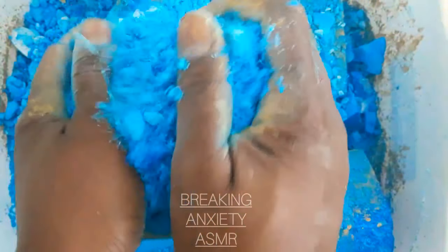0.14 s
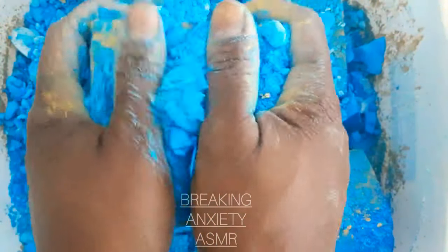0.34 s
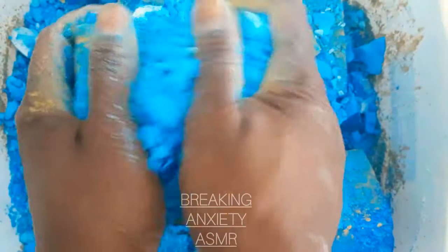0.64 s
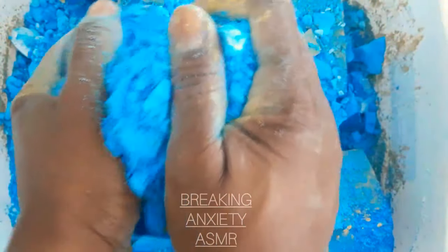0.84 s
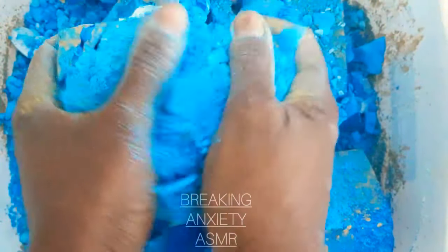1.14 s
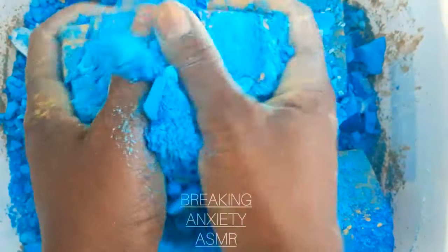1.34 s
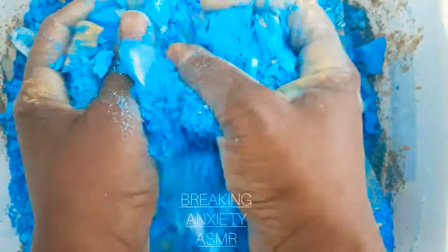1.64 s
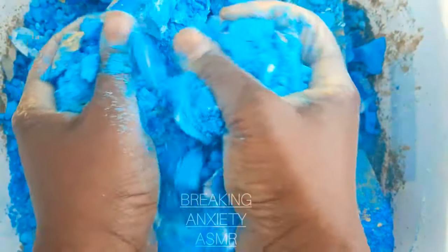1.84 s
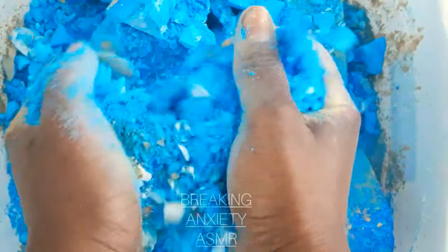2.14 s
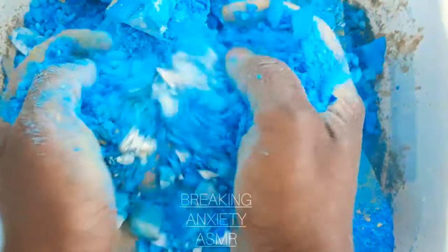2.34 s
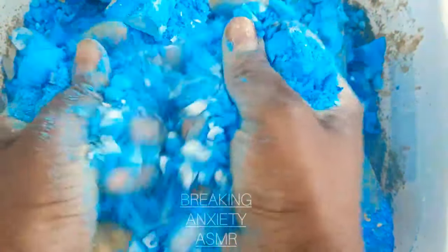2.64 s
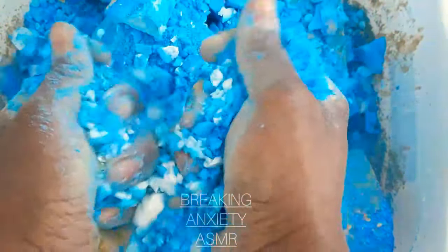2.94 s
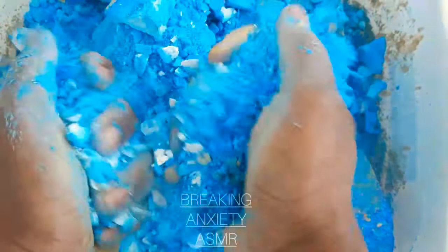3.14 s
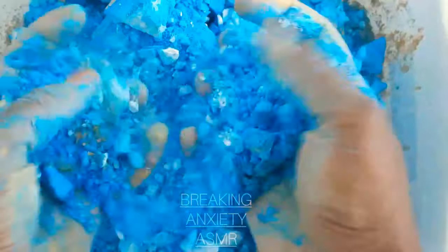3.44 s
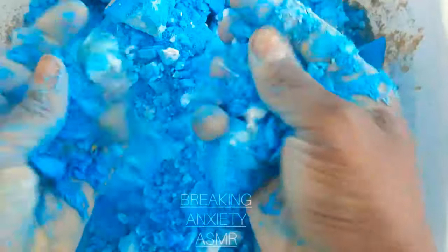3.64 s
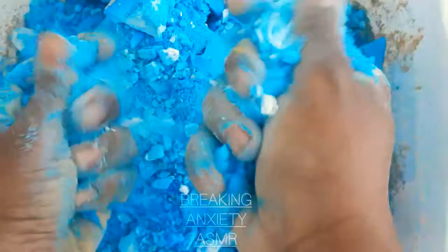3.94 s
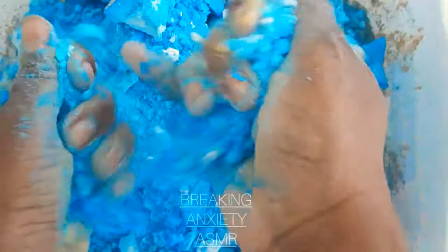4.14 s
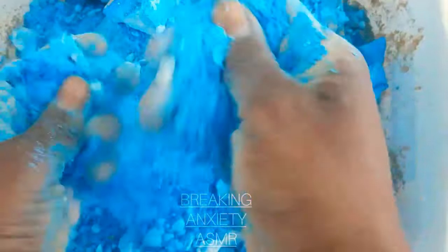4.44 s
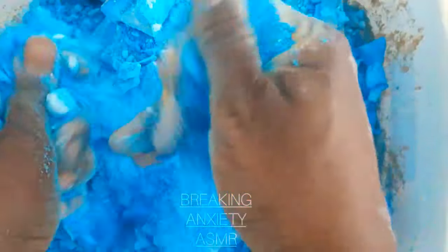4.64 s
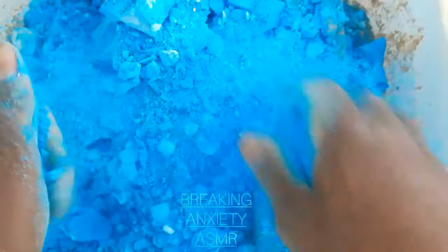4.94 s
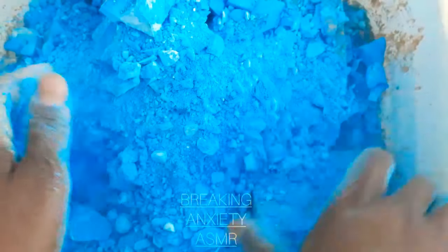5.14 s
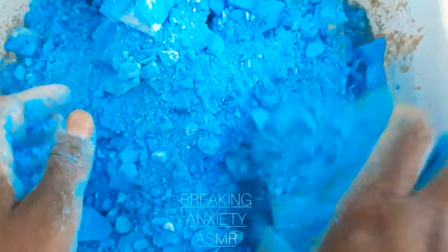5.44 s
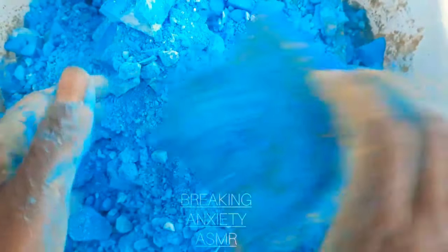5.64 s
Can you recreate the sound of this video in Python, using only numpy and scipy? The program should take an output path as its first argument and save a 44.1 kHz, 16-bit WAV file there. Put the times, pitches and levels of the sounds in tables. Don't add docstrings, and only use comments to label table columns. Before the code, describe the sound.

Brittle chalk cracks and crumbles into powder in irregular bursts, lumps knocking and crumbs pattering into a plastic tub, recorded very close.

```python
import sys
import numpy as np
from scipy import signal
from scipy.io import wavfile
from scipy.ndimage import uniform_filter1d

SR = 44100
rng = np.random.default_rng(int(sys.argv[2]) if len(sys.argv) > 2 else 0)


def transcribe(u):
    v = np.clip(np.atleast_2d(u).T, -1, 1)
    q = np.round(v * 32767).astype(np.int16)
    wavfile.write(sys.argv[1], SR, q)


def nominal_scale(level):
    x = np.asarray(level, float) / 20
    return 10 ** x


N = 254898

# time in seconds, level of the top in dB.
BRITTLE = [
    (0, -14.5),
    (2.15, -13),
    (2.3, -14.5),
    (3.2, -14.5),
    (4.9, -13),
    (5.15, -11),
    (5.3, -28),
    (5.78, -36),
]
# pitch in Hz, level in dB, t60 in seconds.
TUB_LOW = [(96, 0, .16), (120, -12, .1), (181, 0, .15), (215, -1, .11)]
# pitch in Hz, level in dB, t60 in seconds.
TUB_HIGH = [(185, -8.5, 0.13), (287, -8, 0.042), (346.5, 1, 0.056), (464.4, -10, 0.075), (571, 2.5, 0.033),
            (634, -4.5, 0.079), (775, -1, 0.031), (916, -3.5, 0.018), (1044, -2, 0.018),
            (1270, -11.5, 0.016), (1775, -18.5, 0.021), (2390, -26.5, 0.022)]


def evened(x):
    return x / np.sqrt(np.mean(x ** 2) + 1e-20)


def along(rows):
    s, *columns = np.transpose(rows)
    return [np.interp(np.arange(N) / SR, s, column) for column in columns]


def coloured(x, points):
    f, db = np.transpose(points)
    hz = np.abs(np.fft.fftfreq(4096, 1 / SR))
    gain_db = np.interp(np.log(hz + 1), np.log(f), db)
    log_gain = np.log(nominal_scale(np.maximum(gain_db, -100)))
    taps = np.fft.ifft(np.exp(np.conj(signal.hilbert(log_gain)))).real[:2048]
    return signal.oaconvolve(x, taps)[:len(x)]


def add(mix, s, sound):
    part = mix[max(round(s * SR), 0):][:len(sound)]
    part += sound[:len(part)]


def impacts(per_s, spread_db):
    when, sign, size = rng.random(N), rng.choice([-1., 1.], N), rng.exponential(1, N)
    return (when < per_s / SR) * sign * nominal_scale(spread_db * np.minimum(size, 3.8))


def crack(hz, cycles):
    turns = np.arange(200) * hz / SR
    return np.sin(2 * np.pi * turns) * turns * np.exp(-turns / cycles) * hz


def ring(hz, t60, rise_s, phase=0.):
    t = np.arange(SR // 5) / SR
    swell = np.sin(np.pi / 2 * np.minimum(t / max(rise_s, 1 / SR), 1)) ** 2
    return swell * nominal_scale(-60 * t / t60) * np.sin(2 * np.pi * (hz * t + phase))


def squeeze():
    # start in seconds, rise in seconds, hold in seconds, level in dB, release in dB per second.
    squeezes = [(-.05, 0.078, 0.053, -43, 198), (0.044, .012, 0.031, -17.5, 324),
                (0.1, 0.024, 0.049, -32, 146.5), (0.28, 0.026, 0.0092, -34.5, 148),
                (0.376, 0.099, 0.023, -33.5, 400), (0.584, 0.038, 0.19, -41.5, 232),
                (0.526, .02, 0.043, -46, 100), (0.912, 0.041, 0.042, -40.5, 248),
                (1.221, 0.041, 0.068, -44.5, 100), (1.322, 0.061, 0.15, -36.5, 100),
                (1.518, 0.068, 0.017, -30, 32), (1.786, 0.12, 0.015, -31.5, 44),
                (2.05, 0.026, 0.073, -40.5, 58), (2.19, 0.16, 0.27, -40.5, 41),
                (2.486, 0.11, 0.022, -37.5, 81), (2.748, 0.028, 0.21, -40, 101),
                (3.097, 0.026, 0.13, -54.5, 39), (3.445, 0.26, 0.082, -44, 35),
                (3.909, 0.035, 0.014, -41.5, 94), (4.107, 0.095, 0.32, -46.5, 45),
                (4.393, 0.27, 0.022, -42, 34), (5.026, 0.084, 0.1, -40, 240),
                (5.254, 0.021, 0.0045, -46.5, 124), (5.422, .12, 0.12, -52.5, 59)]
    rest_db = -46.5
    t = np.arange(N) / SR
    brittle_db, = along(BRITTLE)
    power = (nominal_scale(rest_db) * np.minimum(nominal_scale(brittle_db + 7), 1)) ** 2
    for start, rise, hold, db, release_db in squeezes:
        swell = np.sin(np.pi / 2 * np.clip((t - start) / max(rise, 1e-3), 0, 1)) ** 2
        since_release = np.clip(t - start - rise - hold, 0, 2)
        power = power + (swell * nominal_scale(db - abs(release_db) * since_release)) ** 2
    return 10 * np.log10(power)


def crumble():
    # frequency in Hz, level in dB per Hz.
    chalk_colour = [(290, -46), (500, 3), (631, -4.5), (708, -2), (1130, -1.5), (1510, -5.5), (2430, -2),
                    (6230, -4), (9630, -14.5), (15100, -33), (16000, -19)]
    grain_hz = [1100, 2300, 3200, 4400, 5800, 7800, 11000]
    top_db, = along(BRITTLE)
    dying = np.exp(-np.arange(1500) / (.0026 * SR))
    bursts = signal.oaconvolve(abs(impacts(130, 4.5)), dying)[:N]
    clumps = 0.29 + bursts / bursts.mean()
    grains = sum(signal.oaconvolve(impacts(600 * clumps, 4.1), crack(hz, 0.32))[:N] for hz in grain_hz)
    grains /= np.sqrt(uniform_filter1d(grains ** 2, 6000) + 1e-9)
    powder = rng.standard_normal(N) * clumps ** 0.27
    x = evened(coloured(grains + evened(powder), chalk_colour))
    top = signal.sosfiltfilt(signal.butter(3, 7200, "high", fs=SR, output="sos"), x)
    return nominal_scale(squeeze()) * (x + top * (nominal_scale(top_db + 14.5) - 1))


def snaps():
    # time in seconds, peak in
    # dB, centre in Hz.
    fractures = [(0.0024, -5.5, 6450), (0.0502, -2.5, 4820), (0.0546, -7, 5570), (0.0623, 1.5, 5040),
                 (0.2983, -12.5, 3020), (0.3016, -19, 4060), (0.3171, -6.5, 5100), (0.347, -21, 2860),
                 (0.3508, -15.5, 3000), (0.4116, -17.5, 3000), (0.4396, -10, 2830), (0.4993, -14, 5200),
                 (0.6135, -18.5, 3430), (0.631, -17.5, 2960), (0.6536, -16, 4500), (0.6677, -24, 3470),
                 (0.6806, -16.5, 4140), (0.689, -17.5, 3450), (0.6964, -27.5, 3360), (0.7105, -18, 3430),
                 (0.7331, -16, 2900), (0.7698, -9.5, 4700), (0.7941, -21, 2940), (0.837, -22, 3460),
                 (0.9167, -24.5, 4410), (0.9403, -16.5, 4360), (0.9712, -10.5, 3200), (1.0049, -21, 6300),
                 (1.0123, -23.5, 3600), (1.1351, -19.5, 5990),
                 (1.266, -28, 3630), (1.276, -23, 4930), (1.3725, -18, 5000), (1.3864, -17.5, 4900),
               (1.4745, -24, 3550), (1.49, -11.5, 7350), (1.5742, -15, 4770), (1.6245, -28, 2540),
               (1.6318, -9.5, 5140), (1.686, -17, 4700), (1.709, -11.5, 5700), (1.726, -7, 2380),
               (1.7322, -12, 3720), (1.769, -15, 3250), (1.8004, -9.5, 5450), (1.8093, -9, 3630),
               (1.8295, -9.5, 3300), (1.845, -12, 5080), (1.8741, -9.5, 3860), (1.8824, -7.5, 5210),
               (1.921, -18, 3920), (1.927, -15, 3350), (1.959, -16.5, 4750), (1.9695, -9.5, 4020),
               (2.059, -11.5, 5840), (2.0682, -13, 3920), (2.0819, -10.5, 5200), (2.1095, -13, 4500),
               (2.1487, -10.5, 6240), (2.4833, -23.5, 4280),
                 (2.4147, -24, 3710), (2.565, -17, 4370), (2.5744, -28, 2380), (2.6154, -21.5, 2340),
              (2.7145, -18.5, 4990), (2.7863, -10, 6200), (2.8211, -16, 4430), (2.8835, -12.5, 2390),
              (2.9787, -21, 2390), (3.0101, -25, 2650), (3.0178, -18.5, 5130), (3.031, -17, 3380),
              (3.1, -18, 5470), (3.5346, -26.5, 5900), (3.6376, -28, 2410), (3.842, -21, 5130),
              (3.893, -21.5, 4320), (3.93, -14, 6000), (3.952, -21, 4800), (3.9705, -18.5, 5500),
              (4.0255, -15.5, 4730), (4.1489, -19, 5930), (4.2497, -21, 6250), (4.6091, -24.5, 3400),
              (4.632, -21, 3960), (4.8015, -17.5, 4450), (4.8572, -14.5, 2460), (5.0719, -31, 4100),
              (5.1367, -35, 2820), (5.1596, -20, 2450)]
    chips_per_s, chip_db, chip_spread_db = 18, 13, 3.5
    onset_s = 0.00099

    when, size, pitch, luck = rng.random((300, 4)).T
    at = (when * N).astype(int)
    chip_peak_db = np.minimum(squeeze()[at], -36) + chip_db + chip_spread_db * size
    chips = np.c_[at / SR, chip_peak_db, 2400 * 2.5 ** pitch]
    chips = chips[luck < chips_per_s * N / SR / len(luck)]
    rows = np.vstack([fractures, chips])

    t = np.arange(400) / SR
    spray, gate = rng.standard_normal((len(rows), 2, len(t))).transpose(1, 0, 2)
    splinters = nominal_scale(-11) * spray * (gate > 1.3) * np.exp(-t / .0022)
    splinters[:, 0] = 1
    soft_top = signal.butter(2, 10500, fs=SR, output="sos")
    splinters = signal.sosfilt(soft_top, splinters)
    out = np.zeros(N)
    for (s, db, hz), train in zip(rows, splinters):
        tick = crack(hz, 0.44) + nominal_scale(-8) * crack(1.98 * hz, 0.34) + nominal_scale(-4) * crack(0.44 * hz, 0.25)
        sound = np.convolve(train, tick)
        add(out, s + onset_s, nominal_scale(db + 1.34) * sound / abs(sound).max())
    return out


def softened(x):
    top_db, = along(BRITTLE)
    top = signal.sosfiltfilt(signal.butter(6, 11500, "high", fs=SR, output="sos"), x)
    return x + top * (nominal_scale(np.minimum(2.1 * (top_db + 12), 3)) - 1)


def walls(x):
    t = np.arange(SR // 8) / SR
    tail = rng.standard_normal(len(t)) * nominal_scale(-60 * t / .12) * (t > .0007)
    return signal.oaconvolve(x, tail / np.linalg.norm(tail))[:N]


def knocks():
    # time in seconds, peak in dB, hardness as tilt in dB per
    landings = [(0.061, -14.5, -3), (0.164, -11, -8.5), (0.501, -16, -4.5), (0.56, -18.5, -9),
                (1.539, -17, -6.5), (1.596, -18.5, 10.5), (1.626, -20.5, -7), (1.663, -22, 9),
                (1.881, -9, 3.5), (2.081, -15.5, -5.5), (2.139, -21.5, 0.5), (2.751, -9, -1.5),
                (2.793, -16.5, 1), (2.882, -29, 7.5), (2.949, -0.5, -0.5), (2.983, -13.5, -7),
                (3.011, -10, 4.5), (3.639, -21.5, 11.5), (3.701, -26, 5), (3.965, -23, 3),
                (4.61, -19.5, 5.5), (4.858, -26, -4), (4.918, -23.5, 9.5), (5.04, -5, -5), (5.1, -7, 2.5),
                (5.16, -15.5, 12), (5.267, -20.5, -2), (5.646, -17.5, 5.5), (5.692, -18, 5.5),
                (5.732, -22, -5.5),
                (.074, -12, 11),
        (2.9587, -0.5, -7.5),
    ]
    hits = np.array(landings)
    rings = np.array([nominal_scale(db) * ring(hz, 0.93 * t60, 1.46 / hz) for hz, db, t60 in TUB_HIGH])
    octaves = np.log2(np.transpose(TUB_HIGH)[0] / 550)
    spots_db = 2.5 * rng.standard_normal((len(hits), len(TUB_HIGH)))
    out = np.zeros(N)
    for (s, db, tilt_db), spot_db in zip(hits, spots_db):
        sound = nominal_scale(spot_db + tilt_db * octaves) @ rings
        blow = crack(780 * nominal_scale(0.42 * tilt_db), 0.65)
        add(sound, .0006, nominal_scale(1.0) * abs(sound).max() * blow / abs(blow).max())
        add(out, s - .0003, nominal_scale(db - 2.0) * sound / abs(sound).max())
    return out


def thuds():
    # time in seconds, deepest pair in dB, second pair in dB.
    pushes = [(0.06, -21.5, -22), (0.187, -46, -24.5), (0.518, -25, -23.5), (1.173, -39, -38.5),
              (1.39, -27, -25), (1.426, -8.5, -8.5), (1.512, -18, -15), (1.839, -18.5, -19.5),
              (1.881, -9.5, -13), (1.97, -34, -22), (2.126, -18, -17), (2.297, -18.5, -24),
              (2.49, -25.5, -39), (2.754, -12.5, -15), (2.788, -14.5, -11.5), (2.943, -33, -15),
              (3.033, -18, -15.5), (3.198, -28.5, -31.5), (3.307, -26.5, -36), (3.439, -56, -28.5),
              (3.637, -52, -28), (4.168, -32, -42.5), (4.482, -33, -22.5), (4.543, -23, -24),
              (4.61, -23, -21), (4.672, -18, -25), (5.151, -18, -51), (5.2755, -3, -19), (5.265, -3, -13),
              (5.637, -25, -26)]
    out = np.zeros(N)
    chance = rng.random((len(pushes), len(TUB_LOW), 2))
    for (s, deep_db, second_db), spot in zip(pushes, chance):
        modes_db = (deep_db, deep_db, second_db - 0.5, second_db + 7.0)
        for (hz, level, t60), db, (a, b) in zip(TUB_LOW, modes_db, spot):
            bent_hz = hz * (1 + 0.086 * (a - .5))
            add(out, s, nominal_scale(db + level - 2.5) * ring(bent_hz, t60, 0.0097, 0.5 * b))
    return out


def rain():
    # time in seconds, flow in dB.
    flow = [(0, -70), (.13, -36), (.42, -50.5), (.7, -57), (1.0, -63), (1.3, -51.5), (1.45, -24),
            (1.72, -36.5), (2.21, -38.5), (2.41, -39.5), (2.64, -33.5), (3.2, -43), (3.57, -43.5),
            (3.96, -49.5), (4.6, -33.5), (4.99, -43.5), (5.2, -30.5), (5.78, -47)]
    boom_db, = along(flow)
    patter_db = -48.5 + (boom_db + 39)
    boom = sum(nominal_scale(db) * signal.oaconvolve(impacts(60, 3.54), ring(hz, 0.54 * t60, 0.0026))[:N]
               for hz, db, t60 in TUB_LOW)
    patter = sum(nominal_scale(db) * signal.oaconvolve(impacts(220, 5.8), ring(hz, 0.3 * t60, 0.00068)[:2500])[:N]
                 for hz, db, t60 in TUB_HIGH)
    return nominal_scale(boom_db) * evened(boom) + nominal_scale(patter_db) * evened(patter)


def room():
    # frequency in Hz, level in dB per Hz.
    room_colour = [(15, -30), (25, -35), (108, 16), (242, -11), (363, -22), (416, -52), (545, -38),
                   (818, -53), (16000, -80)]
    return nominal_scale(-66) * evened(coloured(rng.standard_normal(N), room_colour))


def hiss():
    return nominal_scale(-74) * rng.standard_normal(N)


def scene():
    chalk = softened(crumble() + snaps())
    tub = knocks() + thuds() + rain()
    mono = chalk + nominal_scale(-31) * walls(chalk) + tub + room() + hiss()
    return np.array([mono, mono])


def treble_patches(mono):
    hz, t, z = signal.stft(mono, SR, nperseg=1024)
    patches = rng.random((2, len(t) // 4 + 1, len(hz) // 16 + 1))
    patches = patches.repeat(4, 1).repeat(16, 2)
    luck, turn = patches[:, :len(t), :len(hz)]
    share = np.interp(hz, [7500, 9500, 13000, 16000], [0, .14, .2, .1])
    angle = (np.pi / 2 * np.sqrt(turn) * (luck < share)).T
    scrambled = np.exp(2j * np.pi * rng.random((len(t), len(hz))).T)
    both = np.array([z * np.cos(angle), z * np.sin(angle) * scrambled])
    mid, side = signal.istft(both, SR, nperseg=1024)[1][:, :N]
    return np.array([mid + side, mid - side])


def roll_off(x):
    return signal.sosfilt(signal.butter(12, 16640, fs=SR, output="sos"), x)


def record(dry):
    cut = signal.sosfilt(signal.butter(4, 68, "high", fs=SR, output="sos"), dry[0])
    held = np.clip(cut, -.93, .93)
    lowpass = signal.firwin(255, 16000, window=("kaiser", 9), fs=SR)
    mix = treble_patches(signal.oaconvolve(held, lowpass, "same"))
    return roll_off(mix)


dry = scene()
out = record(dry)
transcribe(out)
```